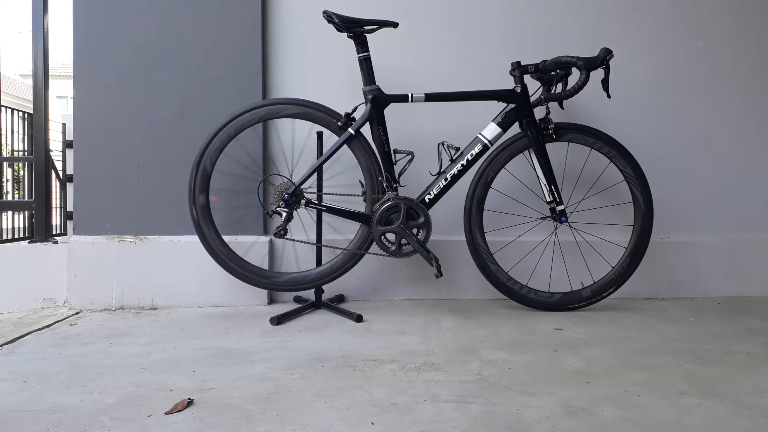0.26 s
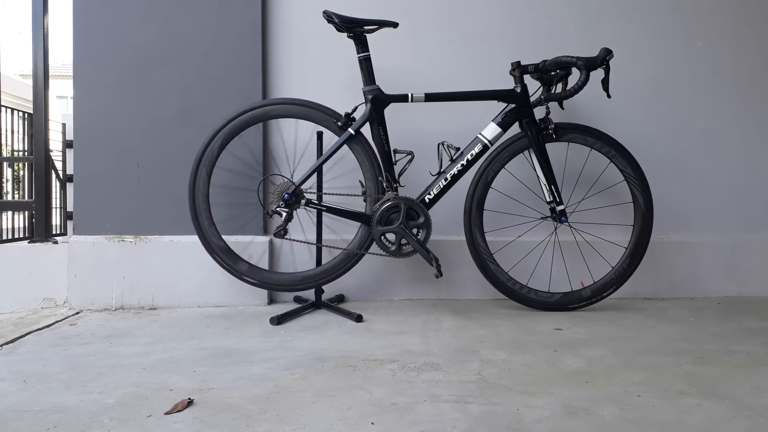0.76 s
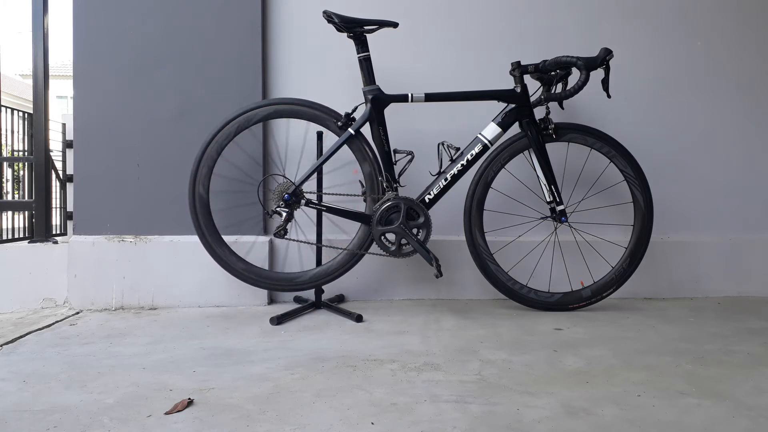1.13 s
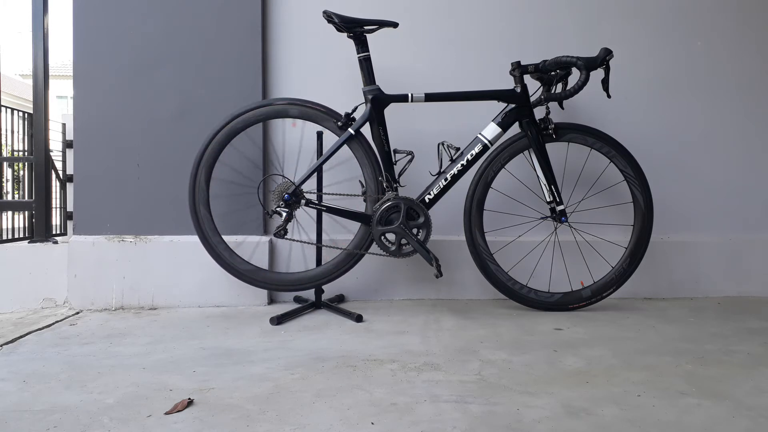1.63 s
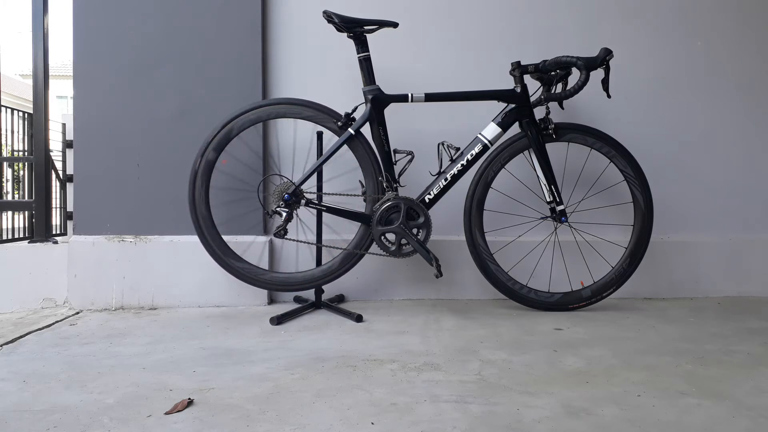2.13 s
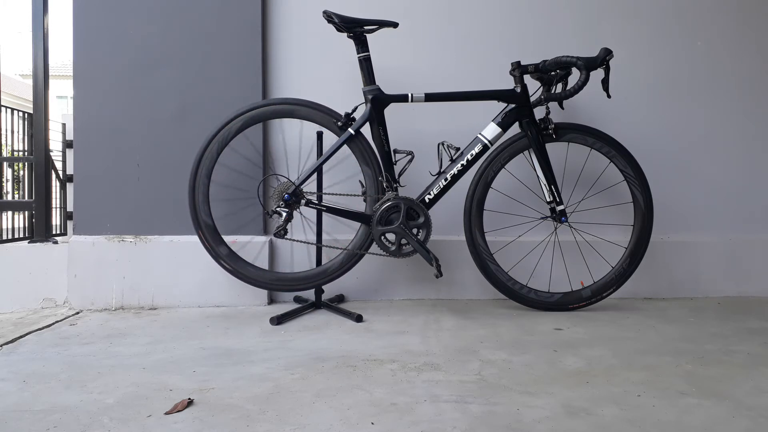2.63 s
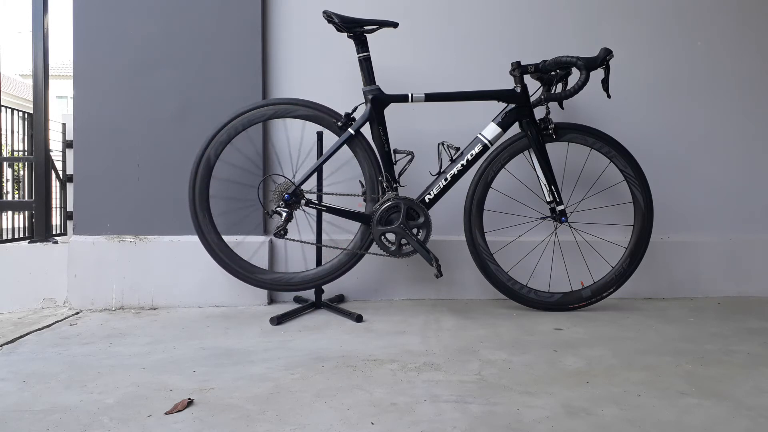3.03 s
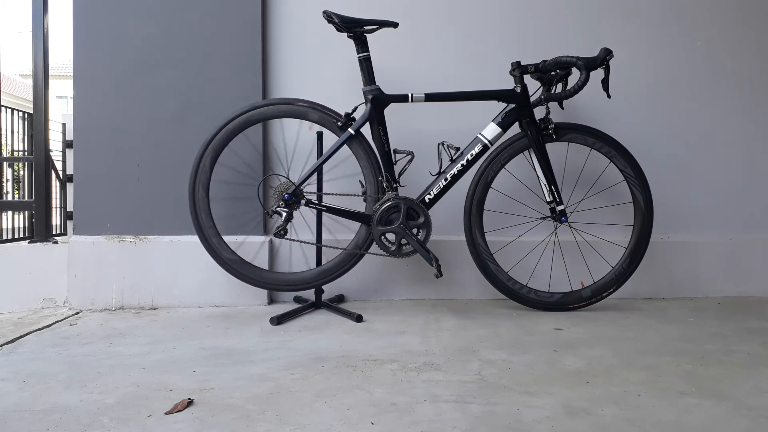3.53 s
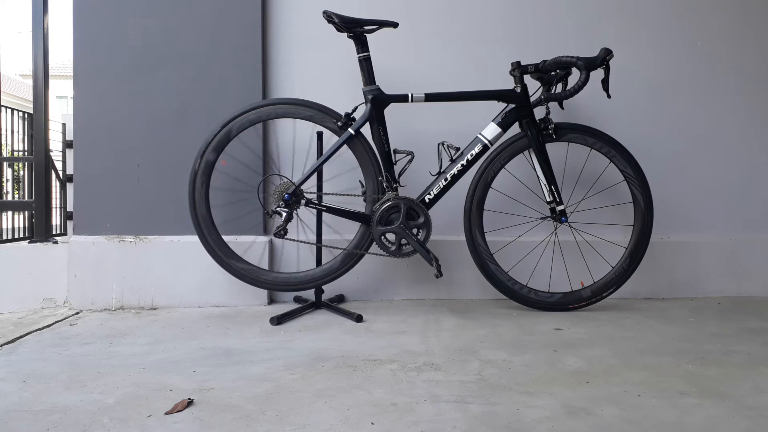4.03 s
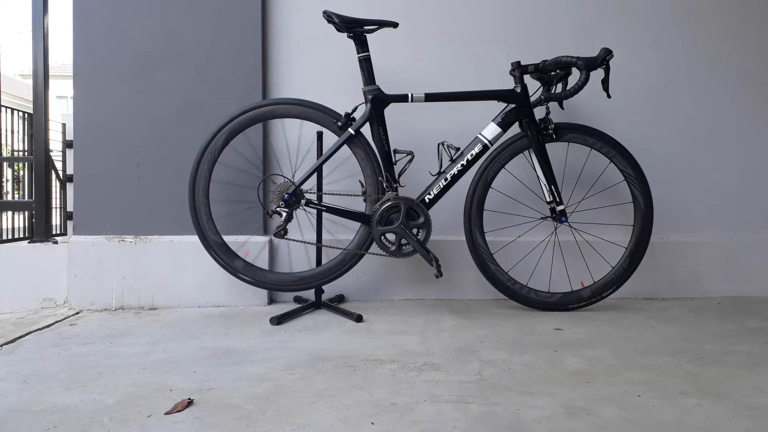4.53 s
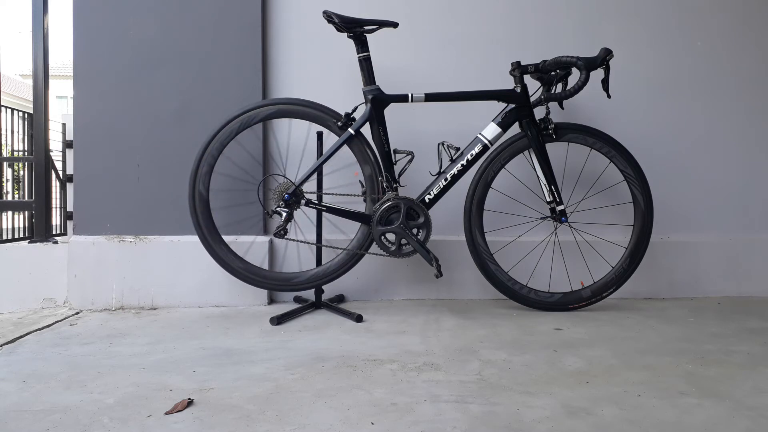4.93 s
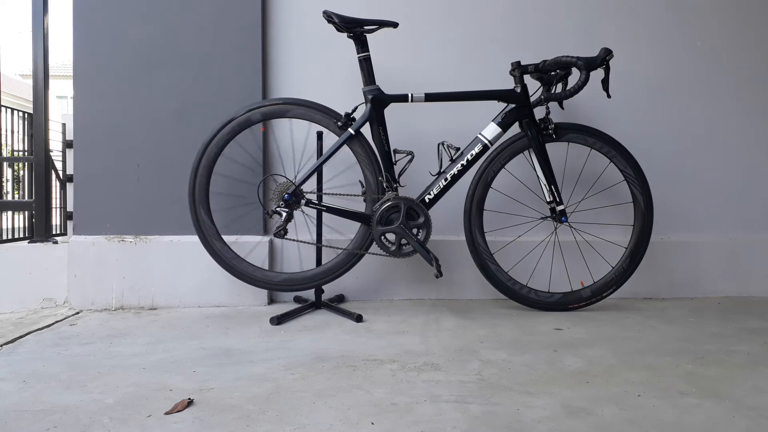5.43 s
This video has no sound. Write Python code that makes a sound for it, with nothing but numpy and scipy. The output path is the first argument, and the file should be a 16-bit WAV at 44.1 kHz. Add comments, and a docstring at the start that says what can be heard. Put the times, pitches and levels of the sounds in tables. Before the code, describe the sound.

A continuous freehub whirr is already running at the start and never stops: about eighty teeth a second, three slightly staggered clicks each, ringing thin metal with a sharp sizzling top. Its tone wavers as the wheel turns and brief zings flare out. The hard-walled yard adds a quick, grainy reverberation. Barely audible beneath are soft distant hoots, two muffled dog woofs and a low rumble. One close microphone channel.

```python
"""A road bike's rear wheel coasts on a stand in a walled yard, buzzing close up and slowly losing speed throughout.
From the start three pawls snap over the ratchet teeth and bounce, ringing frame, sprocket, hub body and ratchet ring;
walls and concrete blur the clicks, and a low town rumble with a faint hum lies behind. Short zings flare from 0.2 s.
Faint hoots (swelling sines) come at 0.4 and 0.7 s, a far-off dog's woof (noise through a throat resonance) at 2.0 s,
more hoots at 2.6 and 2.8 s, a second, fainter woof at 3.2 s and a last hoot at 3.6 s; the wheel is still turning."""
import sys
import numpy as np
from scipy import signal
from scipy.fft import rfft, irfft
from scipy.io import wavfile
from scipy.ndimage import uniform_filter1d

SR = 44100
rng = np.random.default_rng(int(sys.argv[2]) if len(sys.argv) > 2 else 0)


def transcribe(u):
    """Save the signal u as a 16-bit wav file named by the first command-line argument.

    u: samples, shape (n,) or (channels, n), limited to [-1, 1]; the rate is SR.
    q: integer samples, one column per channel.
    """
    v = np.clip(np.atleast_2d(u).T, -1, 1)
    q = np.round(v * 32767).astype(np.int16)
    wavfile.write(sys.argv[1], SR, q)


N = 249606
TIME = np.arange(N) / SR  # s

# Slowing wheel: (time [s], tooth rate [teeth/s])
WHEEL_SPEED = [(0, 81.87), (2.83, 76.46), (5.66, 70.99)]
TEETH = 48  # on the ratchet ring, per wheel turn
# Pawls: (moment of the drop [part of a tooth], relative level [dB], sway per turn [teeth], sway angle [rad])
PAWL_SET = [(.62, 3, .045, 3.9), (.73, 1.5, .035, 2.6), (.85, 1, .04, 5.0)]

# Resonances of rim, frame and sprockets: (frequency [Hz], width [Hz], relative level [dB])
FRAME_MODES = [(833, 71, -8), (928, 41, -9.5), (1000.5, 7.7, 3.5), (1104.4, 24, -0.5), (1238, 25, -4.5),
               (1364, 52, -2.5), (1429, 27, 0.5), (1531, 30, 3), (1591, 14, 8), (1672, 38, 6),
               (1818, 31, 5), (1934, 46, 3), (2030, 26, 9.5), (2103, 28, 4.5), (2270, 64, 7),
               (2485, 27.7, 16.5), (2640, 25, 15), (2785, 38, 8.5), (3155, 27, 14)]
# Sharpest sprocket resonance: (frequency [Hz], width [Hz], relative level [dB])
SPROCKET_TONE = [(2177, 13.4, 0)]
# Resonances of the hub body: (frequency [Hz], width [Hz], relative level [dB])
HUB_MODES = [(2720, 327, -14), (3263, 344, -12.5), (3546, 70, -10), (4023, 240, -14), (4450, 105, -9.5),
             (4510, 490, -17), (4900, 215, -12), (5260, 385, -17.5), (5934, 196, -17), (6830, 345, -15.5),
             (9620, 770, -16), (10355, 280, -9), (11370, 370, -14.5), (12930, 900, -18.5),
             (14270, 870, -15), (15020, 1181, -20)]
# Resonances of the ratchet ring, main one first: (frequency [Hz], width [Hz], relative level [dB])
RATCHET_MODES = [(8718, 224, 0), (7610, 250, -8.5), (8334, 410, -5.5), (9185, 170, -2)]

# Mean levels of the wheel's parts [dB]; the hub body's holds at the starting speed
FRAME_DB, SPROCKET_DB, HUB_DB = -39.5, -45.5, -26
RING_DB, SHIMMER_DB = -25, -25.0  # ratchet ring: main resonance, side resonances

LOSS_DB_PER_SPEED = 0.1039  # snaps weaken by this many dB per tooth/s of speed lost
BITE_DB = 0.4  # +- swing of the bite, one per pawl in each wheel turn
SHIMMER_FOLLOWS = 0.12  # share of the main resonance's swing that the side ones follow

# Ratchet ring's loudness round the wheel: (place [part of a turn], level [dB])
RING_ROUND = [(.02, -0.5), (.07, -1.5), (.15, -2), (.36, 1), (.5, 1.5), (.57, -.5), (.77, -1.8),
              (.86, -0.3)]
FLUTTERS_PER_TURN, FLUTTER_DB = 12, 0.87  # flutter in step with the wheel
WAVER_DB, WAVER_HZ = 1.0, 12  # chance wavering: spread, corner of its smoothing
# Short zings of the ratchet ring: (time [s], extra level [dB])
ZING_TIMES = [(.23, 4), (1.41, 3.5), (2.1, 5), (2.73, 2.5), (2.94, 4)]
ZING_S = 0.017  # from a zing's top until its extra dB fall to 1/e

SPROCKET_SWELL_DB = 2  # +- swing as overtones of the tooth rate pass the sprocket's tone
# Sprocket's loudness round the wheel: (place [part of a turn], level [dB])
SPROCKET_ROUND = [(.02, -2.5), (.15, 1), (.25, 6.5), (.38, -5), (.48, 1), (.62, 2), (.82, -2.5), (.93, 2)]

# Dog's woofs before the distance: (time [s], length [s], throat resonance [Hz], level [dB])
DOG_WOOFS = [(2.03, .11, 478, -44), (3.209, 0.19, 460, -48.5)]
# Low hoots before the distance: (time [s], length [s], pitch [Hz], level [dB])
LOW_HOOTS = [(.39, .14, 277, -54.5), (0.74, .11, 300, -54), (2.613, 0.12, 254, -51),
             (2.837, 0.06, 259, -52), (3.62, 0.084, 338, -53.5)]
# Colour of the town rumble: (frequency [Hz], relative level [dB])
TOWN_COLOUR = [(15, -46), (35, -22), (65, -7.5), (105, 1), (160, -1.5), (230, -2), (300, -2.5), (380, -8.5),
               (490, -6), (700, -9.5), (1000, -12), (1300, -14.5), (2000, -44)]
TOWN_DB = -52
# Faint hum in the rumble: (frequency [Hz], level [dB])
TOWN_HUM = [(197, -62)]
CUTOFF_HZ = 15750  # top of the recorded band


def freehub():
    """Close by: pawl hits ring frame, sprocket, hub body and ratchet ring, each with its own share of yard."""
    drop_at, drop_sizes = pawl_drops(tooth_error_s=.000018, jitter_s=.00002, uneven_db=0.55)
    at, sizes = bouncing(drop_at, drop_sizes, bounce_s=.002, bounce_db=-4, uneven_db=1.2)

    # the low resonances follow the even beat of the drops alone
    frame = high_pass(struck(FRAME_MODES, drop_at, drop_sizes, vary=0.1, near_db=-12, far_db=-4), hz=694)
    sprocket = high_pass(struck(SPROCKET_TONE, drop_at, drop_sizes, vary=0.3, near_db=-5.5, far_db=2.5), hz=1490)
    body = high_pass(struck(HUB_MODES, at, sizes, vary=0.4, near_db=2.0, far_db=5.5), hz=1900)

    chatter_at, chatter_sizes = flank_chatter()
    at = np.concatenate([at, chatter_at])
    sizes = np.concatenate([sizes, chatter_sizes])
    song = high_pass(struck(RATCHET_MODES[:1], at, sizes, vary=0.24, near_db=-4.5, far_db=3), hz=5250)
    shimmer = high_pass(struck(RATCHET_MODES[1:], at, sizes, vary=0.4, near_db=-7, far_db=5.0), hz=5040)

    speed = in_time(WHEEL_SPEED)
    turns = np.cumsum(speed) / SR / TEETH
    bite_db = BITE_DB * ripple(len(PAWL_SET) * turns, top_at=0.78)
    force_db = LOSS_DB_PER_SPEED * (speed - speed[0]) + bite_db
    ring_db = ring_swing_db(turns)
    shimmer_db = force_db + SHIMMER_FOLLOWS * ring_db
    return (from_db(FRAME_DB) * rms_one(frame)
            + from_db(SPROCKET_DB + sprocket_swing_db(speed, turns)) * steady(sprocket, 0.074)
            + from_db(HUB_DB + force_db) * steady(body, 0.17)
            + from_db(RING_DB + ring_db) * steady(song, 0.096)
            + from_db(SHIMMER_DB + shimmer_db) * steady(shimmer, 0.03))


def pawl_drops(tooth_error_s, jitter_s, uneven_db):
    """Times and sizes of the drops: each pawl falls once per tooth."""
    passed = np.cumsum(in_time(WHEEL_SPEED)) / SR
    tooth = np.arange(int(passed[-1]))
    times, sizes = [], []
    for moment, level_db, sway, angle in PAWL_SET:
        # the ring runs slightly off centre, so each pawl leads and lags once per turn
        place = tooth + moment + sway * np.sin(2 * np.pi * tooth / TEETH + angle)
        # uneven teeth shift and size the drops, the same on each turn
        tooth_shift, tooth_size = rng.standard_normal((2, TEETH))[:, tooth % TEETH]
        shift_s = tooth_error_s * tooth_shift + jitter_s * rng.standard_normal(len(tooth))
        times.append(np.interp(place, passed, TIME) + shift_s)
        size_db = level_db + uneven_db * (tooth_size + rng.standard_normal(len(tooth)))
        sizes.append(from_db(size_db))
    return np.concatenate(times), np.concatenate(sizes)


def bouncing(at, sizes, bounce_s, bounce_db, uneven_db):
    """Each drop is followed by two bounces; the contact point varies, so hits push either way."""
    gaps = bounce_s * rng.uniform(.5, 2, (len(at), 3)) * [0, 1, 1]
    levels_db = bounce_db * np.arange(3) + uneven_db * rng.standard_normal(gaps.shape)
    hits = sizes[:, None] * from_db(levels_db) * rng.choice([-1, 1], gaps.shape)
    times = at[:, None] + np.cumsum(gaps, axis=1)
    return times.ravel(), hits.ravel()


def flank_chatter():
    """Pawls also chatter on the tooth flanks at any moment, which feeds the ratchet ring."""
    at = rng.uniform(0, TIME[-1], 1500)
    return at, from_db(5.0 + 1.3 * rng.standard_normal(len(at)))


def ring_swing_db(turns):
    """Swell of the ratchet ring's song: the round of the wheel, a flutter, some chance and the zings."""
    zings = sum(db * np.exp(-((TIME - top_s) / ZING_S) ** 2) for top_s, db in ZING_TIMES)
    flutter = FLUTTER_DB * ripple(FLUTTERS_PER_TURN * turns, top_at=0.18)
    return each_turn(RING_ROUND, turns) + flutter + WAVER_DB * drift(WAVER_HZ) + zings


def sprocket_swing_db(speed, turns):
    """Swell of the sprocket's tone as one overtone of the tooth rate after another passes it, and each turn."""
    overtone = SPROCKET_TONE[0][0] / speed
    return SPROCKET_SWELL_DB * ripple(overtone, top_at=0.24) + each_turn(SPROCKET_ROUND, turns)


def struck(modes, at, sizes, vary, near_db, far_db):
    """Resonances heard through the yard, each struck with a strength of its own at every hit."""
    echoes = yard(clicks(at, sizes), near_db, far_db)
    out = np.zeros(N)
    for k, (hz, width_hz, level_db) in enumerate(modes):
        strengths = sizes * (1 + vary * rng.standard_normal(len(at)))
        ringing = resonate(clicks(at, strengths) + echoes, hz, width_hz)
        out += (-1) ** k * from_db(level_db) * ringing  # neighbours in opposite polarity
    return out


def clicks(at_s, sizes):
    """Impulses of given sizes at given times."""
    at = np.round(at_s * SR).astype(int)
    inside = (at >= 0) & (at < N)
    return np.bincount(at[inside], sizes[inside], N)


def high_pass(x, hz):
    """Small metal parts radiate little bass."""
    return signal.sosfilt(signal.butter(2, hz, "high", fs=SR, output="sos"), x)


def yard(hits, near_db, far_db):
    """Quick echoes from floor and back wall, then the tail between the walls."""
    near = from_db(near_db) * scattered(hits, t60_s=0.13)
    far = from_db(far_db) * scattered(hits, t60_s=0.42)
    return near + far


def scattered(hits, t60_s):
    """Echoes as noise with the hits' decaying energy; the turning wheel throws each click a new way."""
    r = from_db(-120 / (t60_s * SR))  # decay of power per sample
    power = hits ** 2
    # the yard is already ringing at the start
    energy, _ = signal.lfilter([1 - r], [1, -r], power + 1e-18, zi=[r * np.mean(power)])
    return np.sqrt(energy) * rng.standard_normal(N)


def far_woofs():
    """A dog's hoarse woofs: noise through one throat resonance."""
    out = np.zeros(N)
    for start_s, length_s, hz, level_db in DOG_WOOFS:
        throat = resonate(resonate(rng.standard_normal(N), hz, 87), hz, 210)
        out += from_db(level_db) * puff(start_s, length_s) * steady(throat, 0.035)
    return out


def far_hoots():
    """Nearly pure low hoots: sines that swell and fade."""
    out = np.zeros(N)
    for start_s, length_s, hz, level_db in LOW_HOOTS:
        tone = np.sqrt(2) * np.sin(2 * np.pi * hz * TIME)
        out += from_db(level_db) * puff(start_s, length_s) * tone
    return out


def puff(start_s, length_s):
    """A call's effort: a quick rise and a slower fall, top near 1.1."""
    progress = np.clip((TIME - start_s) / length_s, 0, 1)
    return np.sqrt(progress) * (1 - progress) * 2.86


def from_afar(calls):
    """Distance smears the calls with scattered echoes."""
    echoes = signal.fftconvolve(calls, reflections(t60_s=1.0, first_s=.03, per_s=370))[:N]
    return 0.92 * calls + .5 * echoes


def reflections(t60_s, first_s, per_s):
    """Scattered echoes that die away; unit energy."""
    t = TIME[:SR]
    present = (rng.random(SR) < per_s / SR) * (t > first_s)
    echoes = rng.standard_normal(SR) * present * from_db(-60 * t / t60_s)
    return echoes / np.sqrt(np.sum(echoes ** 2) + 1e-20)


def town():
    """A smooth low rumble, noise shaped over frequency, with a wavering hum of narrow noise in it."""
    hz, level_db = np.transpose(TOWN_COLOUR)
    bins = np.maximum(np.fft.rfftfreq(N, 1 / SR), 1)
    colour = from_db(np.interp(np.log(bins), np.log(hz), level_db))
    rumble = irfft(rfft(rng.standard_normal(N)) * colour, N)
    out = from_db(TOWN_DB) * rms_one(rumble)
    for tone_hz, db in TOWN_HUM:
        out += from_db(db) * rms_one(resonate(rng.standard_normal(N), tone_hz, 3.0))
    return out


def resonate(x, hz, width_hz):
    """One resonance with gain near 1 at its top."""
    r = np.exp(-np.pi * width_hz / SR)
    feed = np.array([1, 0, -1]) * (1 - r * r) / 2
    back = [1, -2 * r * np.cos(2 * np.pi * hz / SR), r * r]
    return signal.lfilter(feed, back, x + 1e-18)


def from_db(db):
    """Decibels to gain."""
    return 10 ** (np.asarray(db) / 20)


def rms_one(x):
    """Scale to unit power."""
    return x / np.sqrt(np.mean(x ** 2) + 1e-20)


def steady(x, seconds):
    """Even out level changes slower than the given time; unit power."""
    size = int(seconds * SR)
    power = uniform_filter1d(uniform_filter1d(x ** 2, size), size)
    return x / np.sqrt(power + 1e-20)


def in_time(rows):
    """A curve's value at every sample."""
    return np.interp(TIME, *np.transpose(rows))


def each_turn(rows, turns):
    """A pattern that comes round with the wheel."""
    return np.interp(turns, *np.transpose(rows), period=1)


def ripple(cycles, top_at):
    """A swing of +-1 per cycle, highest at the given part of the cycle."""
    return np.cos(2 * np.pi * (cycles - top_at))


def drift(corner_hz):
    """Slow chance of unit power: noise smoothed twice."""
    r = np.exp(-2 * np.pi * corner_hz / SR)
    smooth = signal.lfilter([1], [1, -2 * r, r * r], rng.standard_normal(N + SR))
    return rms_one(smooth[SR:])  # the first second settles the filter


def scene():
    """The coasting wheel in front, far calls and the town behind, in mono."""
    calls = from_afar(far_woofs() + far_hoots())
    return (freehub() + calls + town())[None]


def record(dry):
    """One microphone channel; the top is cut steeply."""
    return signal.sosfilt(signal.ellip(12, .1, 90, CUTOFF_HZ, fs=SR, output="sos"), dry)


dry = scene()
out = record(dry)
transcribe(out)
```